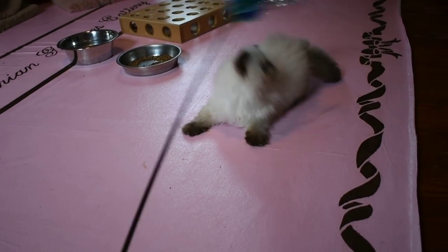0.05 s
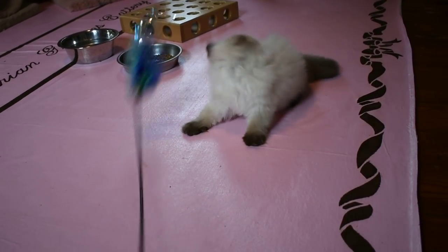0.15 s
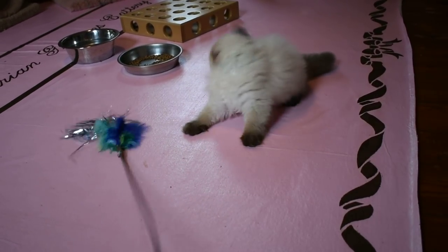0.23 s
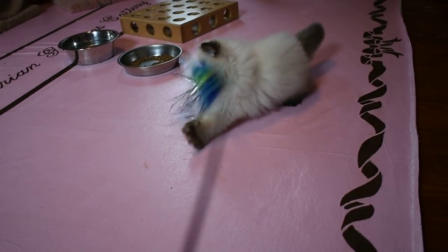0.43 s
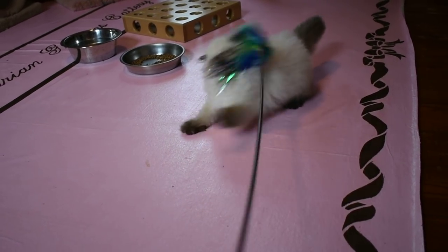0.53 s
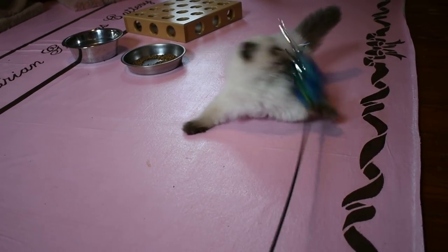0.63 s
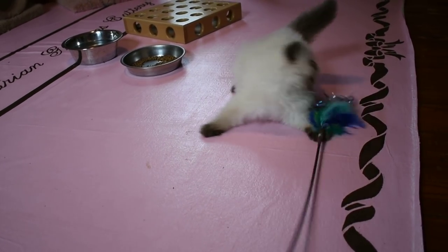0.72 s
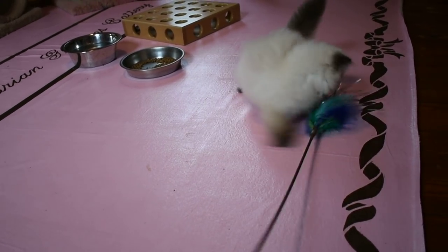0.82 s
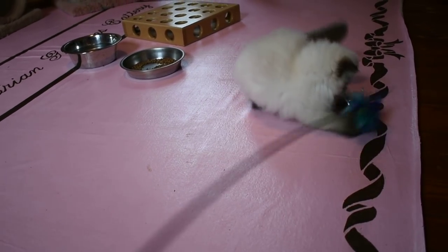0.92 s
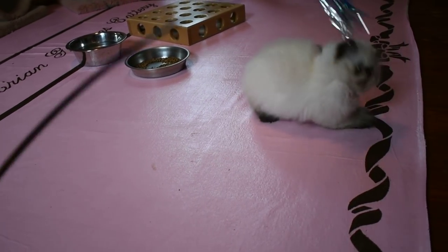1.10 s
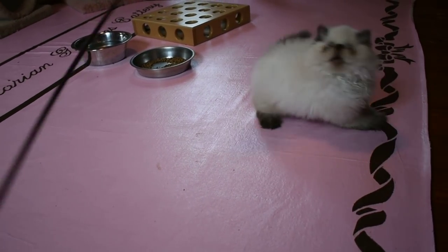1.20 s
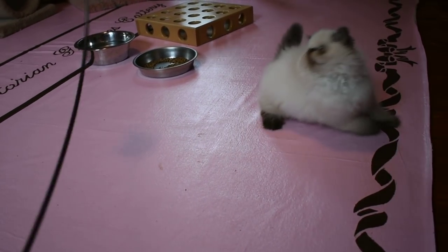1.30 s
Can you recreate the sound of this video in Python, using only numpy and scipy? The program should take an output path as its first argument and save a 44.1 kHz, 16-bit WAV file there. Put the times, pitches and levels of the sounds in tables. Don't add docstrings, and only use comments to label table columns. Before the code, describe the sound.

A feather and tinsel cat toy rustles faintly, then slaps a floor mat at 0.24 seconds with a cluster of sharp snaps, a low thud and dragging feathers until 0.4. Foil ticks crisply. Soft paws thud around 0.55-0.65; claws skid and click at 0.7-0.87. Fur brushes and the wand swishes from 0.9 to 1.1, with small stirrings near 1.2, then quiet humming room air in a small, hard room.

```python
import sys
import numpy as np
from scipy import signal
from scipy.fft import rfft, irfft, next_fast_len
from scipy.io import wavfile
from scipy.ndimage import map_coordinates

SR = 44100
rng = np.random.default_rng(int(sys.argv[2]) if len(sys.argv) > 2 else 0)


def put_to_file(sound):
    columns = np.atleast_2d(sound).T
    safe = np.clip(columns, -1, 1)
    whole_steps = np.round(safe * 32767)
    wavfile.write(sys.argv[1], SR, whole_steps.astype(np.int16))


def convert_level_to_amplitude(level_db):
    exponent = np.asarray(level_db, float) / 20
    return 10 ** exponent


N = 59535

# [f/Hz, level/dB]
AIR_COLOUR = [(18, -37), (30, -16.5), (345, -2), (433, -11), (801, -11), (1150, -17.5), (1350, -12.5),
              (3300, -16), (7000, -17.5), (9100, -14), (15400, -120)]
# [f/Hz, width/Hz, level/dB]
HUM_BANDS = [
    (232, 5.6, -64.5),
    (65, 9.6, -72.5),
    (345, 23, -82),
    (159, 15, -78),
]
# [t/s, level/dB]
DRONE_LEVEL = [(0, -61), (.04, -53), (.13, -61), (.4, -61), (.5, -72), (.65, -62), (.8, -59.5), (.9, -66.5),
               (1.03, -57.5), (1.12, -69)]
# [f/Hz, time to fall 60 dB/s]
ROOM_DECAY = [(200, 0.35), (800, 0.59), (3000, 0.46), (8000, 0.34), (14000, 0.51)]
# [t/s, level/dB, f/Hz, time to fall 60 dB/s]
THUD_HITS = [(.237, -39, 231.7, 0.39), (0.242, -28, 325, 0.14), (0.295, -36.5, 337, 0.18),
             (0.333, -41.5, 295, 0.2), (0.54, -41, 211.2, 0.25), (0.576, -54, 240.8, 0.092),
             (0.603, -44.5, 316, 0.088), (0.639, -39, 345, 0.082), (0.718, -50, 243.4, 0.44),
             (1.172, -50, 246.7, 0.17), (1.201, -51.5, 231.5, 0.17)]
# [t/s, level/dB]
FUR_SCUFF = [
    (.5, -82),
    (.535, -54),
    (.57, -51.5),
    (.63, -53),
    (.69, -56.5),
    (.7, -45.5),
]
# [t/s, level/dB]
KITTEN_TURN = [
    (.91, -71),
    (.935, -44),
    (.97, -49),
    (1.05, -56),
    (1.12, -64.5),
    (1.145, -54.5),
    (1.2, -53),
    (1.25, -70),
]
# [f/Hz, level/dB]
FUR_COLOUR = [(300, -35), (600, -2.5), (800, 1.5), (1200, -6.5), (2500, -5), (5000, -6.5), (9000, -29)]
# [t/s, level/dB]
CLAW_SKID = [
    (.703, -37),
    (.71, -35),
    (.725, -35.5),
    (.75, -36),
    (.775, -44),
    (.8, -38.5),
    (.835, -39),
    (.866, -32.5),
    (.871, -37),
]
# [f/Hz, level/dB]
CLAW_COLOUR = [(240, -53), (400, -31), (503, -6.5), (1220, -2.5), (1590, -1), (3110, -1.5), (8280, -3.5),
               (15500, -38)]
# [t/s, level/dB, f/Hz]
CLAW_CATCHES = [(0.6995, -28, 3500), (0.7051, -16, 4100), (0.7079, -13, 3800), (0.7103, -29, 3700),
                (0.712, -20, 3200), (0.7151, -21, 3600), (0.7169, -27, 3600), (0.7258, -26, 4700),
                (0.7285, -27, 3200), (0.7405, -27, 2700), (0.7423, -26, 3100), (0.7454, -27, 3400),
                (0.747, -25, 3400), (0.762, -24, 3300), (0.7636, -29, 5500), (0.7667, -28, 3100),
                (0.7749, -28, 3500), (0.7822, -29, 3600), (0.7939, -24, 3500), (0.7983, -26, 4100),
                (0.8021, -24, 3500), (0.8041, -22, 3700), (0.8061, -26, 8000), (0.8125, -24, 5400),
                (0.8186, -22, 4400), (0.8236, -26, 4300), (0.8251, -26, 4100), (0.8323, -27, 5000),
                (0.8341, -25, 3900), (0.838, -29, 4200), (0.8401, -23, 4700), (0.8434, -22, 4500),
                (0.8481, -24, 4800), (0.8501, -26, 3800), (0.8531, -22, 3400), (0.8569, -23, 3200),
                (0.8593, -25, 4300), (0.861, -21, 4300), (0.8642, -18, 4800), (0.8668, -17, 3900)]
# [t/s, level/dB]
TINSEL_MOTION = [(0, -51.5), (.1, -52), (.2, -54), (.232, -50), (.24, -33.5), (.33, -48.5), (.365, -39),
                 (.44, -46.5), (.5, -45), (.57, -44), (.6, -53.5), (.66, -55), (.7, -46), (.88, -46.5),
                 (1.03, -49), (1.13, -52), (1.24, -55.5), (1.35, -58)]
# [f/Hz, level/dB]
FOIL_COLOUR = [(1500, -49), (3000, -4.5), (6000, -3.5), (10000, -2), (13000, -0.5), (15000, -9),
               (16000, -14)]
# [t/s, length/s, level/dB, dullness 0-1]
TINSEL_FLICKS = [(0.028, 0.0041, -47.5, .05), (0.038, 0.00088, -42, 1), (0.115, 0.013, -40, 0.04),
                 (0.215, 0.0034, -40, 0), (0.22, 0.011, -46, 0.04), (0.565, 0.024, -45.5, .9),
                 (0.74, 0.011, -37, 0.46), (0.794, 0.025, -35.5, 0.74), (0.922, 0.01, -37.5, 0.77),
                 (1.165, 0.021, -47.5, 0.61), (1.192, 0.017, -42.5, 0.85)]
# [t/s, level/dB, f/Hz]
FOIL_TICKS = [(0.0277, -35, 10700), (0.0525, -44, 8100), (0.0755, -39, 12100), (0.3013, -32, 10600),
              (0.3161, -33, 12600), (0.354, -24, 13300), (0.3596, -27.5, 13300), (0.3634, -22, 12000),
              (0.372, -27, 12400), (0.3968, -34.5, 8100), (0.4456, -51, 12000), (0.4521, -37, 12200),
              (0.4696, -39, 10600), (0.4797, -40.5, 9740), (0.5341, -36, 8500), (0.5534, -26, 8500),
              (0.58, -36, 10050), (0.5925, -37, 13500), (0.626, -59, 9600), (0.6432, -41, 11100),
              (0.649, -42, 12000), (0.928, -37.5, 7500), (0.9325, -29, 8900), (1.0372, -33, 9800),
              (1.0663, -44.5, 8650), (1.0854, -54, 10000), (1.113, -36.5, 10200), (1.1795, -34.5, 6430),
              (1.194, -42, 6200), (1.197, -36, 6250), (1.2024, -43, 6400), (1.2135, -33, 7500),
              (1.2334, -31, 12100), (1.238, -38, 12700), (1.2489, -40, 12100), (1.2766, -54, 9000),
              (1.2916, -51, 10600), (1.3036, -49, 6400), (1.3119, -46.5, 8580)]
# [t/s, level/dB, f/Hz]
WAND_SWISH = [
    (.88, -57, 3360),
    (0.946, -42.5, 3030),
    (0.971, -44.5, 894),
    (1.01, -42, 1040),
    (1.08, -58.5, 1330),
    (1.13, -63, 900),
    (1.191, -52, 900),
    (1.26, -58.5, 1240),
]
# [t/s, level/dB]
SLAP_STRENGTH = [
    (.2368, -72),
    (.238, -18),
    (.242, -31),
    (.262, -28),
    (.285, -31),
    (.298, -28),
    (.304, -29.5),
    (.36, -45.5),
    (.42, -49),
]
# [f/Hz, level/dB]
MAT_COLOUR = [(60, -48), (100, -15), (333, -6.5), (600, -3), (930, -1), (1200, -10), (1900, -4),
              (2800, -12), (15500, -25)]
# [t/s, ring level/dB, f/Hz, edge level/dB]
SNAP_HITS = [(.1183, -22, 8900, -26), (.1227, -26, 9300, -30), (.2378, -15, 1200, -20),
             (.2402, -10, 6500, -16), (.2405, -11, 6900, -16), (.2458, -10, 4200, -5),
             (.2459, -13, 2300, -30), (.2553, 2, 3200, -2), (.2553, -11, 5800, -12),
             (.2568, -15, 3500, -30), (.274, -2.5, 3000, -1), (.2742, -10, 5600, -9),
             (.2828, -11, 8900, -22), (.3537, -22, 2900, -34), (.3715, -26, 7500, -36),
             (.6986, -29, 3600, -45), (.7111, -19, 3300, -30), (.82, -23, 2600, -40)]


def unit(x):
    return x / np.sqrt(np.mean(x ** 2) + 1e-20)


def along(points, hz):
    f, v = np.transpose(points)
    return np.interp(np.log(hz + 1), np.log(f + 1), v)


def curves(rows):
    s, *cols = np.transpose(rows)
    return [np.interp(np.arange(N) / SR, s, c) for c in cols]


def gated(rows):
    t = np.arange(N) / SR
    return convert_level_to_amplitude(curves(rows)[0]) * (t >= rows[0][0]) * (t <= rows[-1][0])


def wobble(rate):
    points = rng.standard_normal(int(N * rate / SR) + 4)
    return map_coordinates(points, [np.arange(N) * rate / SR])


def filtered(x, response):
    m = next_fast_len(N + SR // 2)
    return irfft(rfft(x, m) * response(np.fft.rfftfreq(m, 1 / SR)), m)[:N]


def noise(spectrum, lumpy_db, rate):
    fluttering = rng.standard_normal(N) * convert_level_to_amplitude(lumpy_db * wobble(rate))
    return unit(filtered(fluttering, lambda hz: convert_level_to_amplitude(along(spectrum, hz))))


def placed(s, waves):
    at = np.round(s * SR).astype(int)[:, None] + np.arange(waves.shape[1])
    return np.bincount(at.ravel(), waves.ravel(), N + SR)[:N]


def grains(s, gain, hz, cycles, size=64):
    u = hz[:, None] * np.arange(size) / SR
    swell = (u / cycles) * np.exp(1 - (u / cycles) ** 2) * .7
    return placed(s, gain[:, None] * np.sin(2 * np.pi * u) * swell)


def struck(s, gain, hz, cycles, size=160):
    u = hz[:, None] * np.arange(size) / SR
    return placed(s, gain[:, None] * np.sin(2 * np.pi * u) * np.exp(-u / cycles))


def crackle(rate, hz, spread, cycles, scatter_db):
    r = rng.random((4000, 4))[:int(rate * N / SR)]
    pitch = np.minimum(hz * np.exp(spread * 2 * (r[:, 1] + r[:, 3] - 1)), SR / 3)
    size_db = scatter_db * np.minimum(-np.log(r[:, 2]), 2) + 10 * np.log10(pitch / hz)
    return unit(grains(r[:, 0] * N / SR, convert_level_to_amplitude(size_db), pitch, cycles))


def room_air():
    fade_start_s, fade_db_per_s = 1.55, -25
    late = np.maximum(np.arange(N) / SR - fade_start_s, 0)
    return convert_level_to_amplitude(-54.5 + fade_db_per_s * late) * noise(AIR_COLOUR, lumpy_db=-1.76, rate=11.42)


def appliance_hum():
    hum = np.zeros(N)
    for hz, width, db in HUM_BANDS:
        band = filtered(rng.standard_normal(N), lambda f: 1 / (1 + ((f - hz) / width * 2) ** 2))
        hum += convert_level_to_amplitude(db) * unit(band)
    return hum


def floor_drone():
    drone_hz = 104.4
    level = convert_level_to_amplitude(curves(DRONE_LEVEL)[0] + 2.47 * wobble(14.4))
    return level * np.sin(2 * np.pi * drone_hz * np.arange(N) / SR + 0.92 * wobble(13.0))


def room(x):
    wet_db, build_s, delay = -6, 0.0092, 100
    hz, t, z = signal.stft(rng.standard_normal(SR * 3 // 4), SR, nperseg=256)
    decay = convert_level_to_amplitude(-60 * t / along(ROOM_DECAY, hz)[:, None])
    tail = signal.istft(z * decay, SR, nperseg=256)[1]
    tail = tail * (1 - np.exp(-np.arange(len(tail)) / SR / build_s))
    return convert_level_to_amplitude(wet_db) * signal.fftconvolve(np.pad(x, (delay, 0)), tail / np.linalg.norm(tail))[:N]


def thuds():
    out, t = np.zeros(N + SR), np.arange(SR // 3) / SR
    puff = noise([(80, -48), (200, 9), (600, 0.0), (1200, -19.5)], lumpy_db=4.5, rate=15.9)
    for s, db, hz, t60 in THUD_HITS:
        start = round(s * SR)
        ring = np.sin(2 * np.pi * hz * t + 0.7 * wobble(44)[:len(t)])
        ring += 0.22 * np.sin(2 * np.pi * 1.7 * hz * t + 6 * rng.random())
        ring += 0.73 * np.resize(puff[start:], len(t))
        soft_start = 1 - np.exp(-t / 0.0043)
        out[start:][:len(t)] += convert_level_to_amplitude(db - 60 * t / t60) * soft_start * ring
    return out[:N]


def fur():
    return (gated(FUR_SCUFF) + gated(KITTEN_TURN)) * noise(FUR_COLOUR, lumpy_db=0.5, rate=18.4)


def skid():
    slips = crackle(rate=1100, hz=3400, spread=.2, cycles=1.8, scatter_db=4) * convert_level_to_amplitude(2 * wobble(70))
    scrape = noise(CLAW_COLOUR, lumpy_db=1.5, rate=150)
    return gated(CLAW_SKID) * unit(scrape + convert_level_to_amplitude(-6) * unit(slips))


def catches():
    s, db, hz = np.transpose(CLAW_CATCHES)
    level_db, edge_db = 1.5, -1.5
    rings = struck(s, convert_level_to_amplitude(db + level_db), hz, cycles=1.67)
    rings += struck(s, convert_level_to_amplitude(db + level_db + edge_db), 1.54 * hz, cycles=1.0)
    thin = signal.butter(2, [1800, 11000], "band", fs=SR, output="sos")
    return signal.sosfilt(thin, rings)


def tinsel():
    t = np.arange(N) / SR
    bright = noise([(2000, -22), (6000, -11), (10000, -1), (15500, -11)], lumpy_db=3, rate=440)
    dull = noise([(700, -30), (2000, -8), (4000, 0), (7000, -6), (12000, -25)], lumpy_db=2.5, rate=500)
    flicks = np.zeros(N)
    for s, length, db, dullness in TINSEL_FLICKS:
        swell = np.exp(-((t - s - length / 2) / (length / 2)) ** 2)
        flicks += convert_level_to_amplitude(db) * swell * (np.sqrt(1 - dullness) * bright + np.sqrt(dullness) * dull)
    hiss = noise(FOIL_COLOUR, lumpy_db=1.0, rate=60)
    rustle = crackle(rate=1800, hz=9660, spread=0.25, cycles=2.6, scatter_db=10)
    return unit(hiss + convert_level_to_amplitude(-3) * rustle) * convert_level_to_amplitude(curves(TINSEL_MOTION)[0]) + flicks


def ticks():
    s, db, hz = np.transpose(FOIL_TICKS)
    return grains(s, convert_level_to_amplitude(db + 2), hz, cycles=2.53)


def swish():
    octaves, overtone, overtone_db = .3, 1.8, 2
    pitch = curves(WAND_SWISH)[1]

    def near(centre, hz):
        return np.exp(-(np.log2(hz / centre) / octaves) ** 2)

    rush = np.zeros(N)
    for c in np.geomspace(700, 4000, 9):
        share = near(c, pitch) + convert_level_to_amplitude(overtone_db) * near(c, overtone * pitch)
        rush += share * noise([(c / 2, -35), (c / 1.12, 0), (c * 1.12, 0), (c * 3, -20)], 2.5, 120)
    return gated([row[:2] for row in WAND_SWISH]) * unit(rush)


def slap():
    return gated(SLAP_STRENGTH) * noise(MAT_COLOUR, lumpy_db=2.5, rate=300)


def snaps():
    s, db, hz, edge_db = np.transpose(SNAP_HITS)
    ring = grains(s - .0001, convert_level_to_amplitude(db), hz, cycles=1.2)
    knock = grains(s, convert_level_to_amplitude(db - 9), hz / 2, cycles=.8)
    edge = grains(s - .00005, convert_level_to_amplitude(edge_db + 1.5), np.full(len(s), 9500), cycles=.55)
    return ring + knock + edge


def scene():
    background = room_air() + appliance_hum() + floor_drone()
    near = thuds() + fur() + skid() + catches() + swish() + slap() + snaps()
    return (near + room(near) + tinsel() + ticks() + background)[None]


def low_pass(x):
    return signal.sosfilt(signal.butter(12, 15850, fs=SR, output="sos"), x)


def record(dry):
    top_hz = 15900
    x = filtered(dry[0], lambda hz: 1 / (1 + (hz / top_hz) ** 60))
    return low_pass(np.clip(x, -1, 1)[None])


dry = scene()
out = record(dry)
put_to_file(out)
```